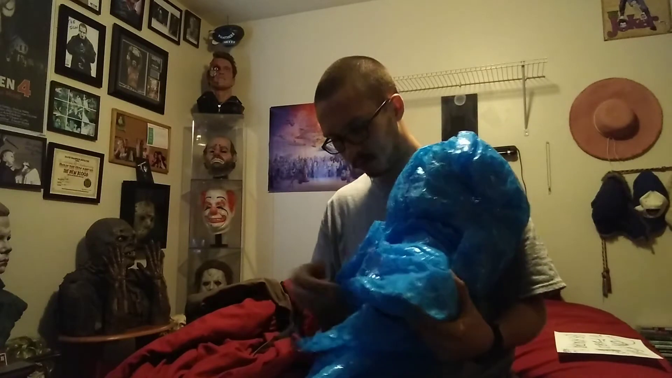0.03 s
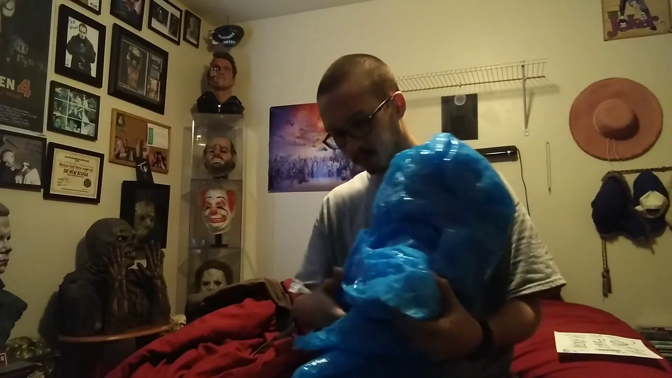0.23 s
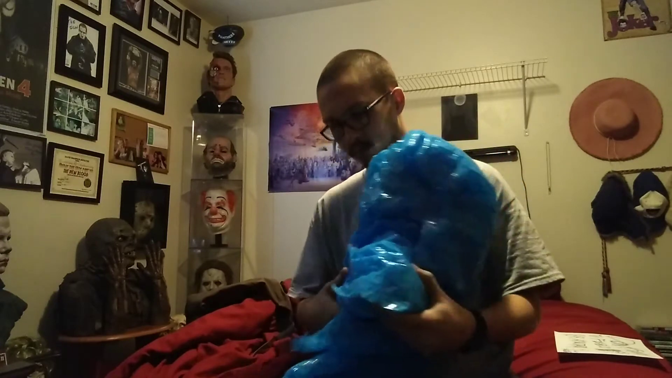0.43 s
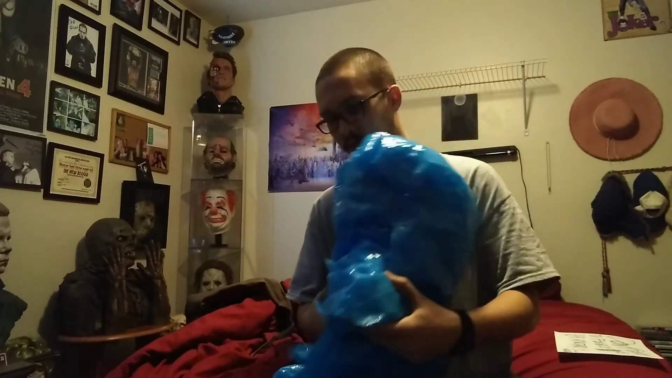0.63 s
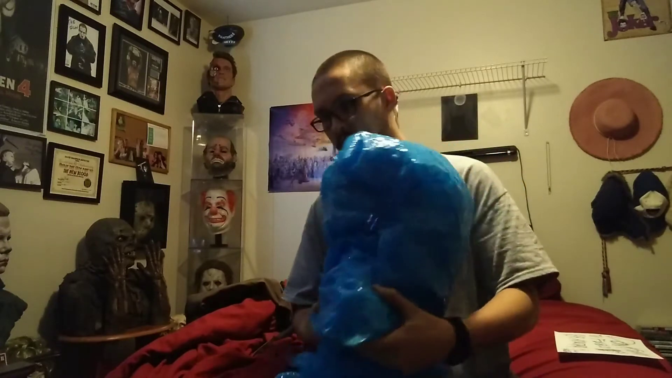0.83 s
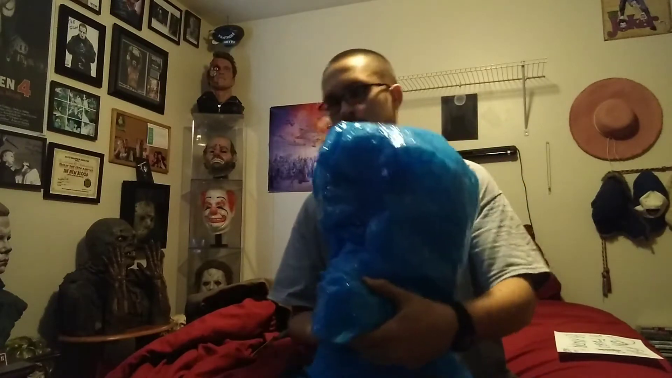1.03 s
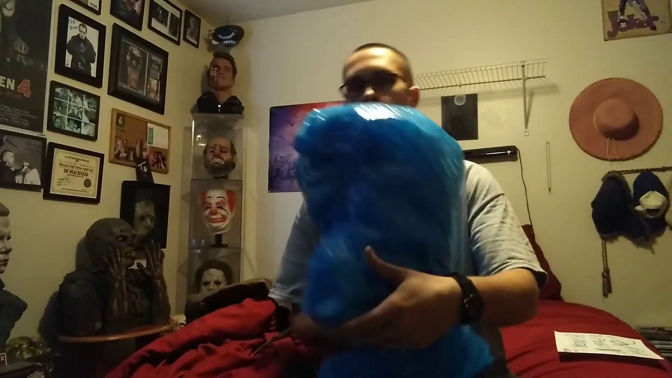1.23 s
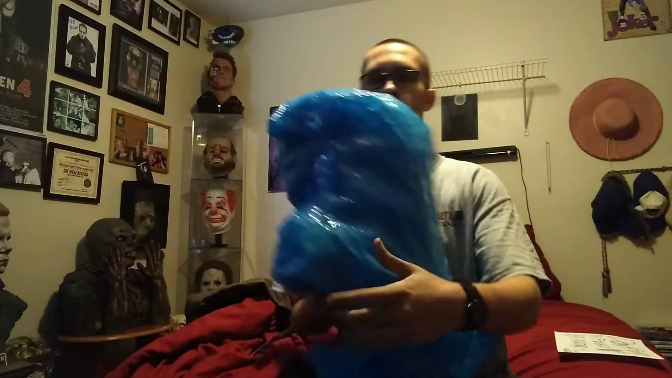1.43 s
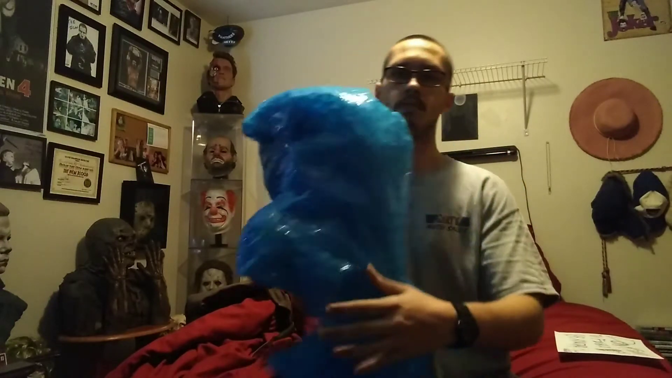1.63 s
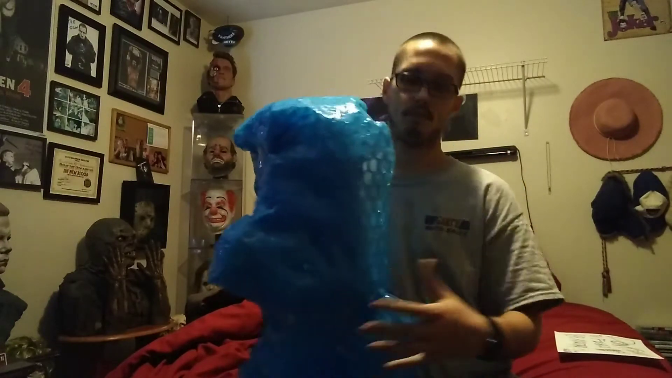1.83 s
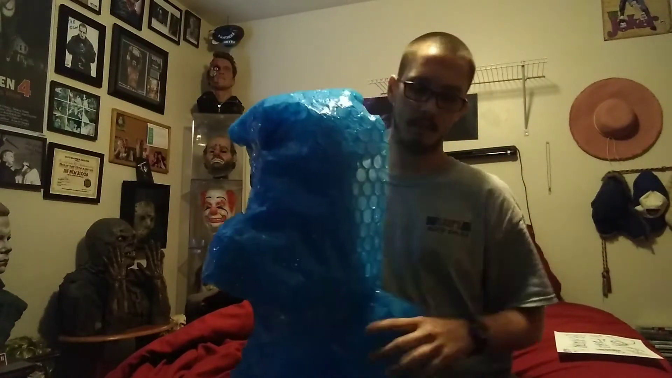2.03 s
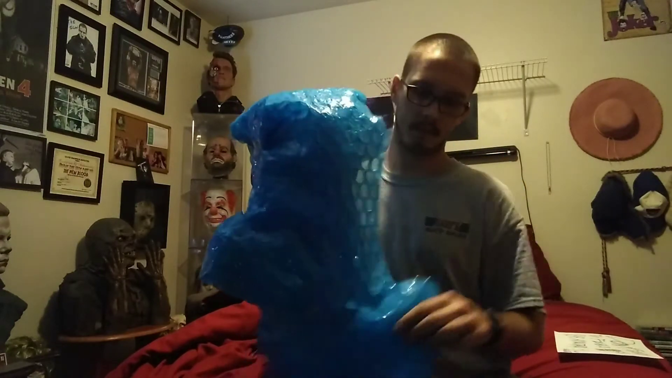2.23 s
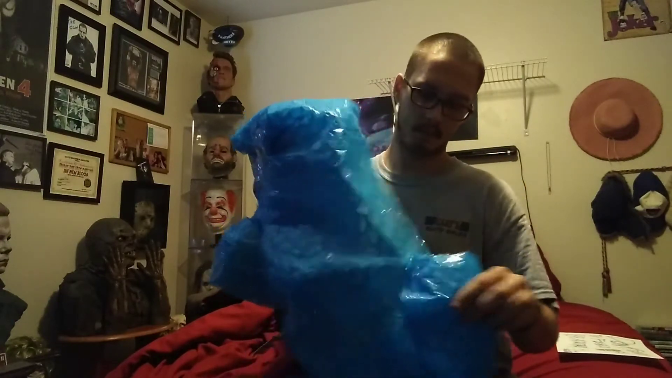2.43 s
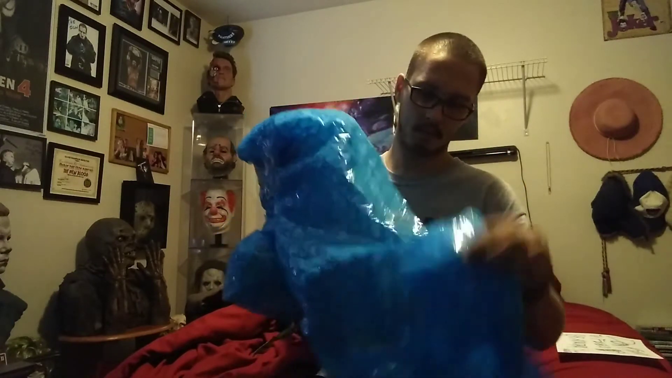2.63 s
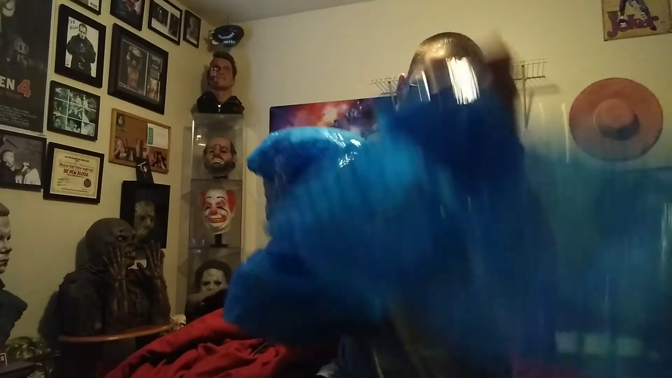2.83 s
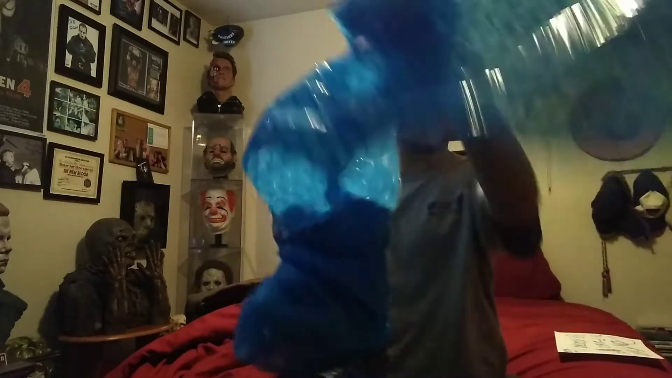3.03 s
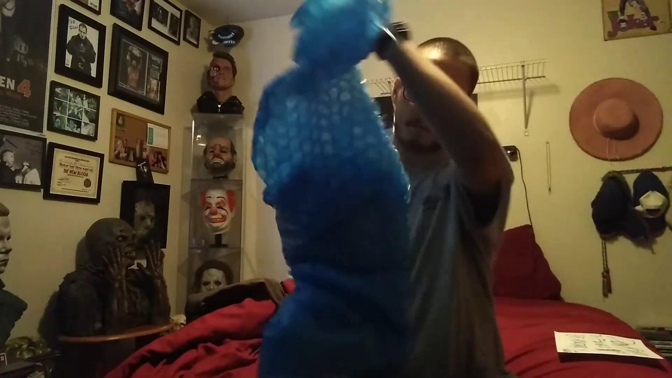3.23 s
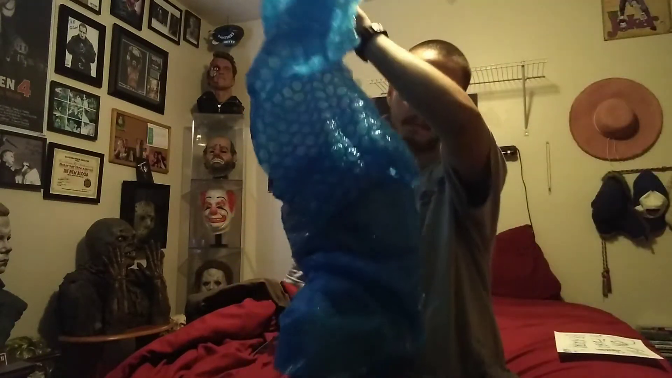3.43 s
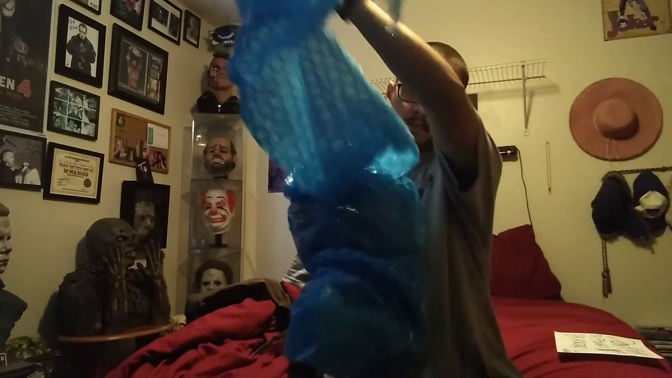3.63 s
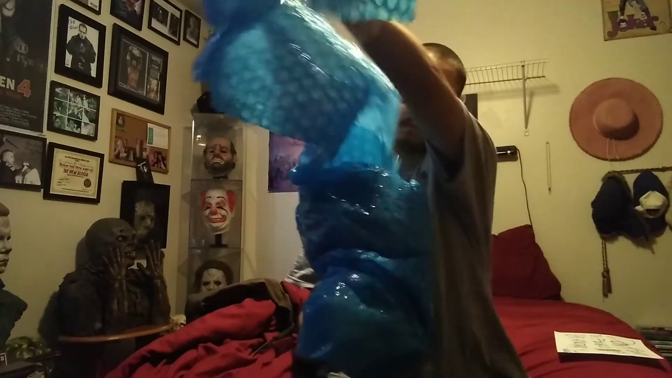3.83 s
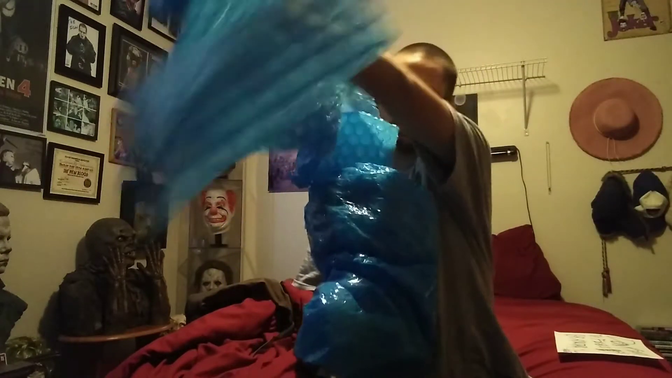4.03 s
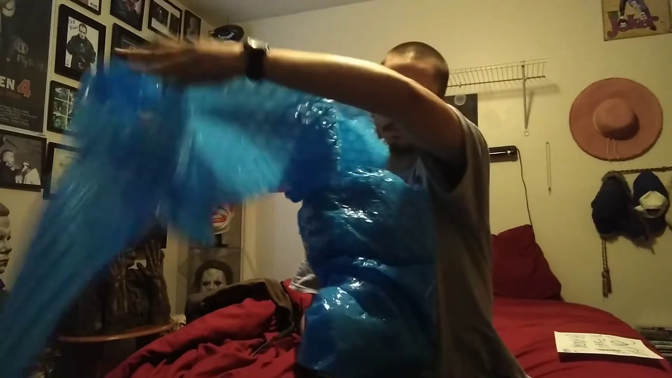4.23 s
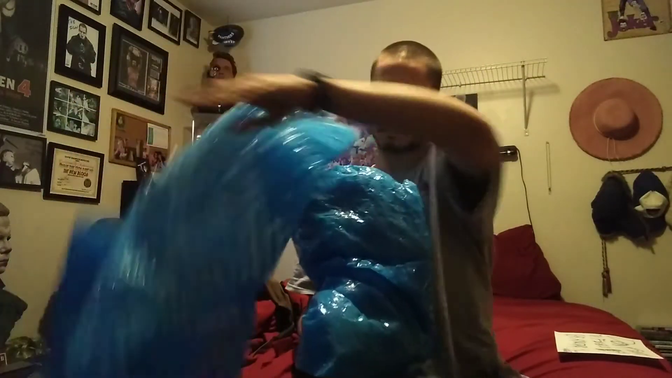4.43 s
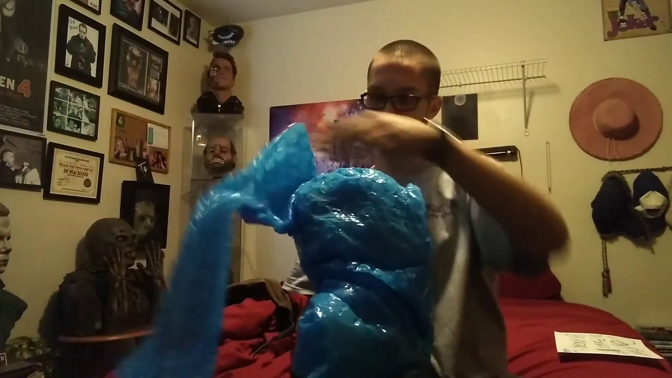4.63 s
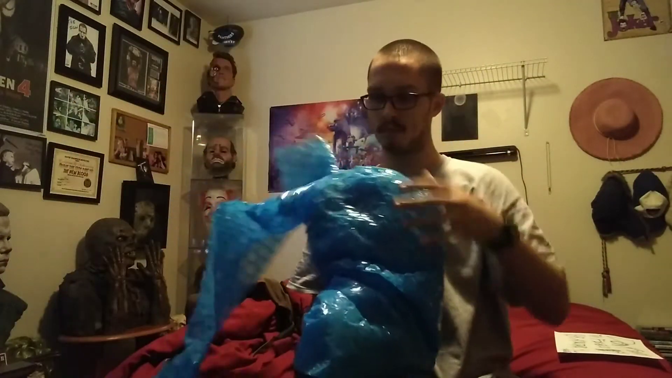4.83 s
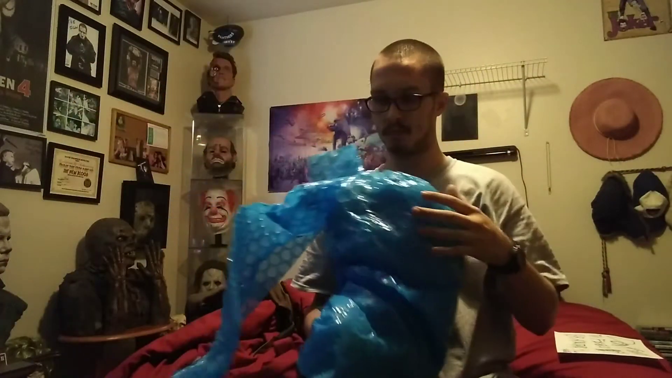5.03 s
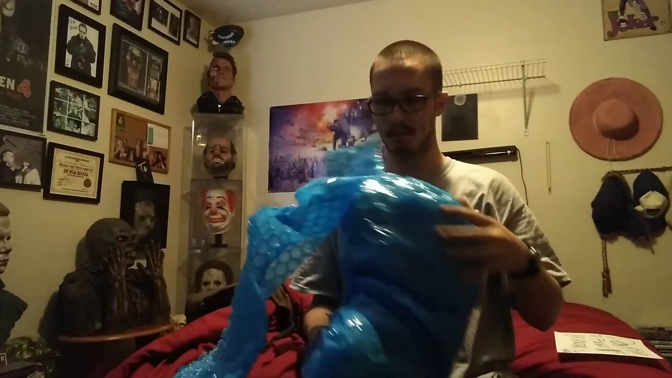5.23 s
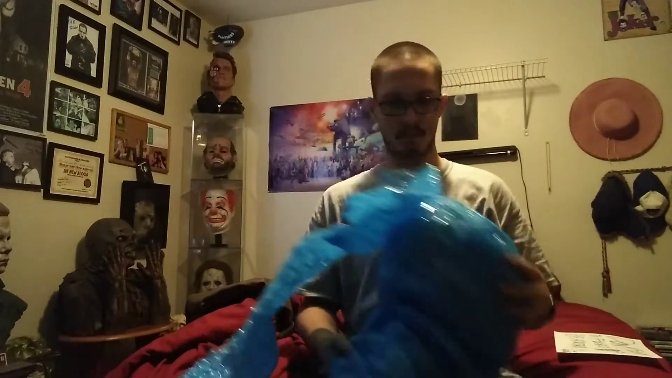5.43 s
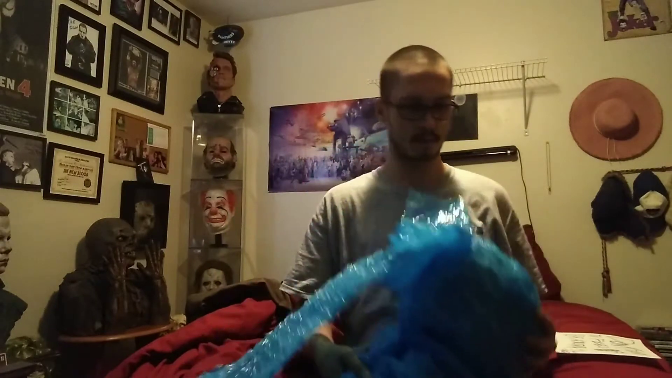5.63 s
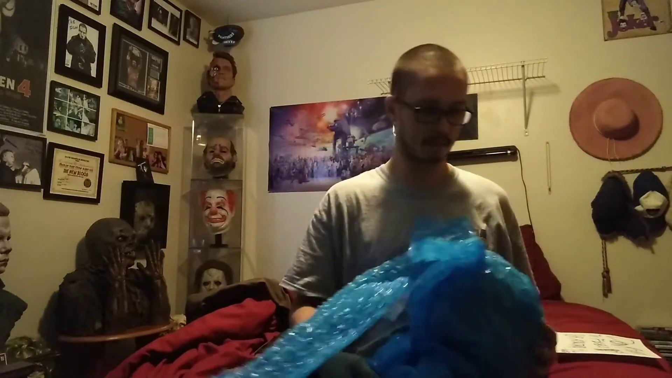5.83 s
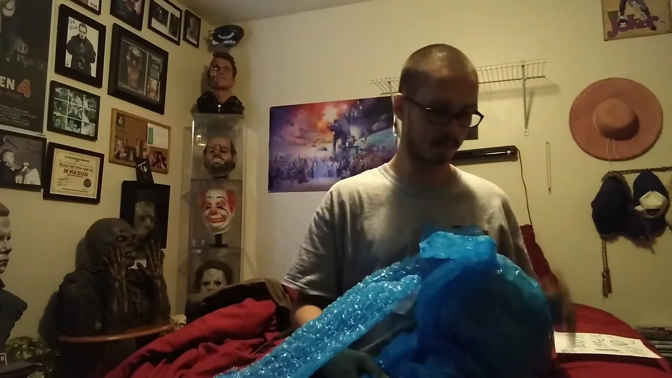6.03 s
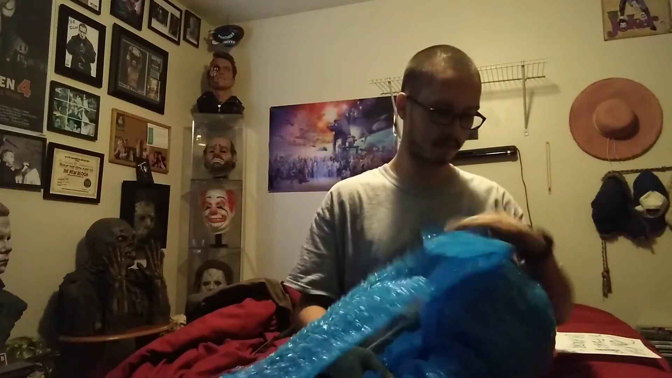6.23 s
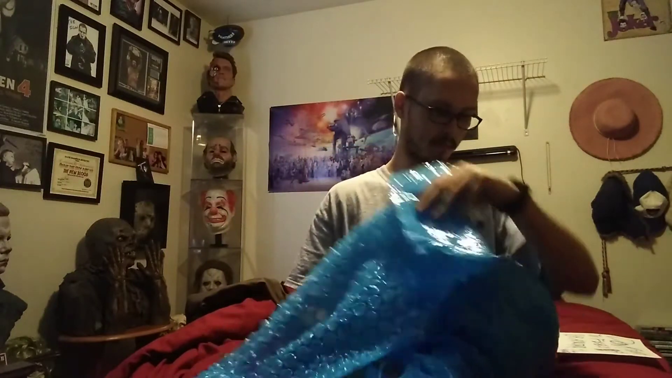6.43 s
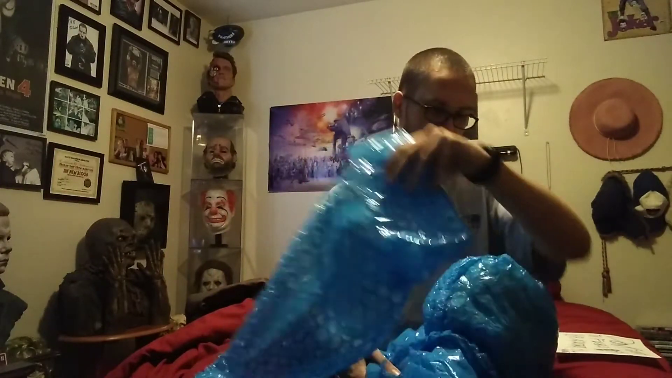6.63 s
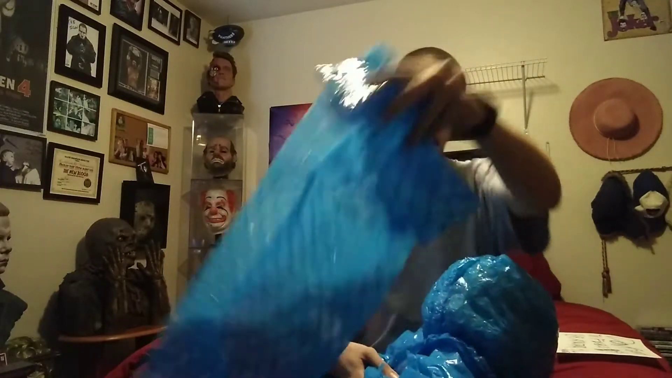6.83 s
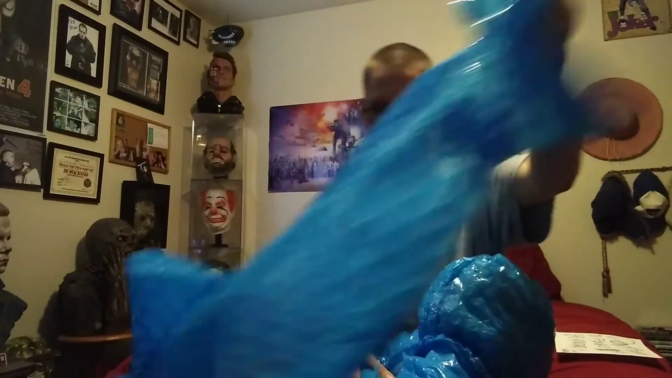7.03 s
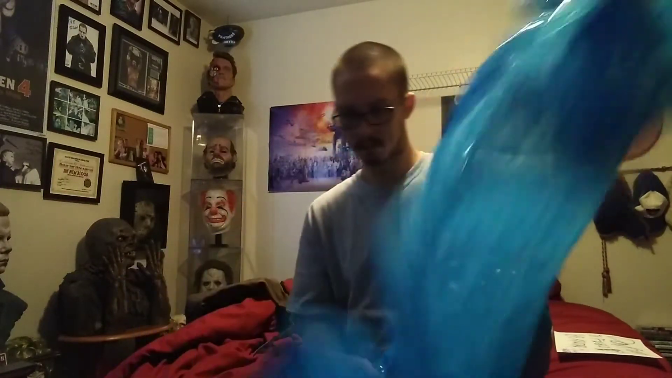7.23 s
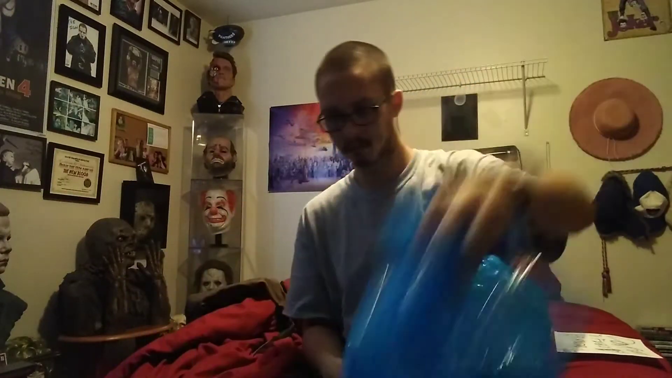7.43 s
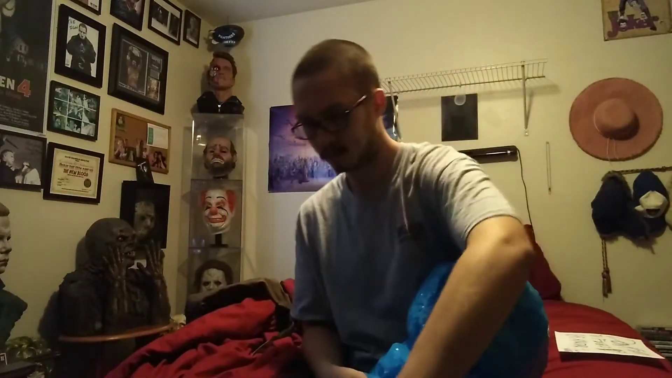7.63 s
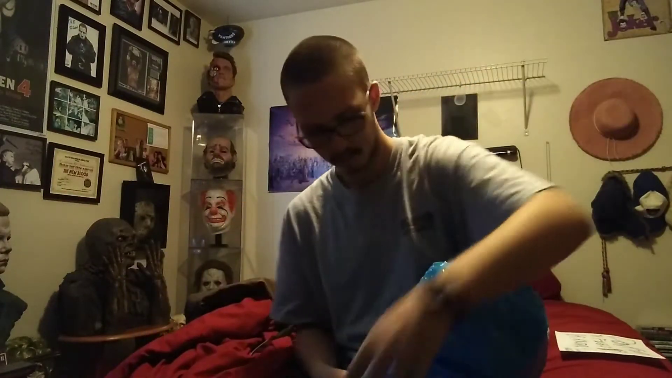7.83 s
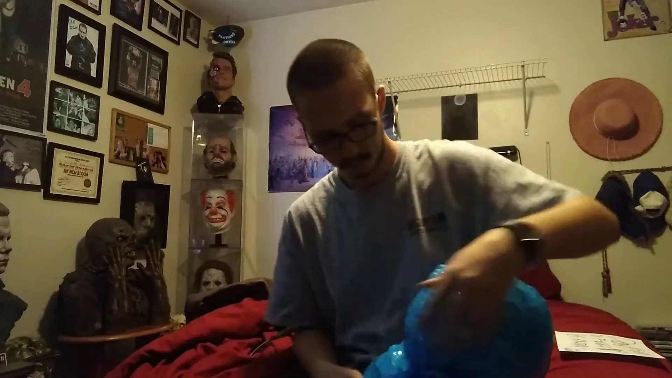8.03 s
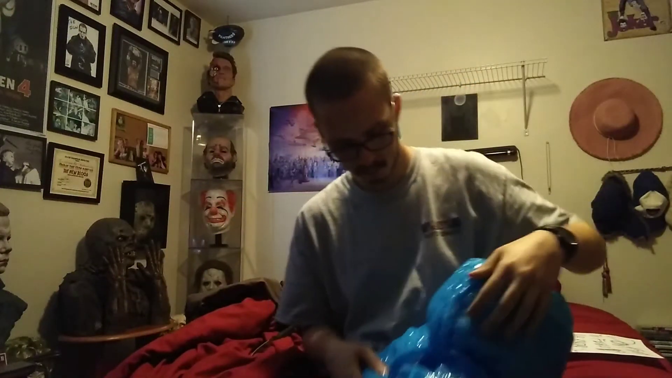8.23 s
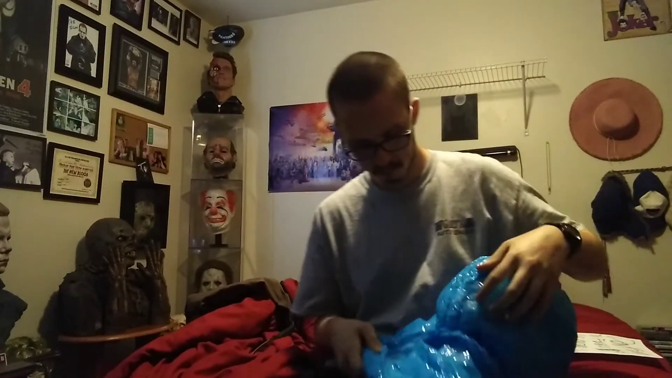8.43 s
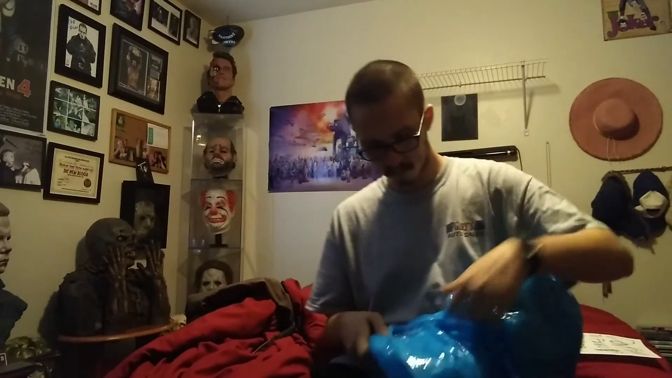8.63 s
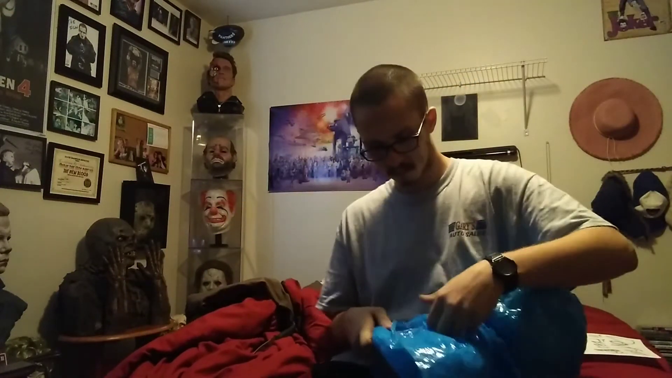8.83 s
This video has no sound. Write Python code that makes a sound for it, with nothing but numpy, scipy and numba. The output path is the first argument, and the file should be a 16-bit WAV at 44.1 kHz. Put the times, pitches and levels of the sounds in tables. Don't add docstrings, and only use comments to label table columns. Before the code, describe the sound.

Hands crinkle and pull crackly plastic bubble wrap off a bundle in a small quiet room, with sharp snaps and one loud ripping burst.

```python
import sys
import numpy as np
from scipy import signal
from scipy.fft import rfft, irfft
from scipy.io import wavfile
from scipy.ndimage import uniform_filter1d
from numba import njit

SR = 44100
rng = np.random.default_rng(int(sys.argv[2]) if len(sys.argv) > 2 else 0)


def nominal_scale(level):
    x = np.asarray(level, float) / 20
    return 10 ** x


def output_pcm(signal):
    pcm = np.clip(np.atleast_2d(signal).T, -1, 1) * 32767
    wavfile.write(sys.argv[1], SR, np.round(pcm).astype(np.int16))


N = 392490

# (start t/s, length t/s, first level/dB, last level/dB)
PULLS = [(0.163, 0.095, -56, -49), (0.629, 0.096, -54.5, -60), (0.911, 0.086, -54.5, -47.5),
         (1.09, 0.074, -53.5, -53), (1.243, 0.1, -58.5, -64.5), (1.468, 0.14, -48, -56),
         (2.199, 0.2, -50, -57), (2.67, 0.11, -57, -58.5), (2.765, 0.14, -51.5, -53.5),
         (2.981, 0.25, -50.5, -42), (3.264, 0.22, -39, -52), (3.48, 0.08, -50, -44.5),
         (3.647, 0.099, -36, -36.5), (4.007, 0.17, -50.5, -48.5), (4.564, 0.121, -52.5, -43),
         (5.073, 0.41, -66, -65.5), (5.52, 0.39, -64, -67), (5.779, 0.11, -53, -47),
         (6.765, 0.12, -53.5, -42), (6.916, 0.18, -41, -37), (7.263, 0.12, -45.5, -38),
         (7.486, 0.19, -42, -43.5), (7.678, 0.16, -43, -53.5), (7.803, 0.39, -53, -71.5),
         (8.285, 0.4, -68, -55.5), (8.73, 0.22, -54, -49)]
# (start t/s, length t/s, first level/dB, last level/dB)
TUGS = [(0.34, 0.036, -48.5, -46.5), (.51, 0.021, -59, -55), (0.31, .01, -57, -59),
        (4.86, .15, -65.5, -69.5), (1.645, 0.14, -68, -74), (2.05, .06, -72, -69),
        (0.766, 0.081, -60.5, -64), (1.906, 0.02, -62, -74), (2.399, .04, -51.5, -60),
        (2.488, 0.06, -56, -37.5), (3.582, .006, -35.5, -32), (3.888, 0.042, -61, -58),
        (4.225, 0.03, -42.5, -35.5), (4.444, 0.037, -63.5, -52.5), (4.785, .01, -53.5, -54.5),
        (5.977, 0.019, -63, -56.5), (6.295, 0.038, -55.5, -35), (6.34, 0.039, -36.5, -24),
        (6.399, 0.055, -31, -26), (6.5, 0.034, -34, -33), (7.14, 0.022, -41, -41),
        (7.166, 0.0072, -34, -39.5), (8.166, 0.039, -63.5, -52), (8.64, 0.034, -57, -55),
        (1.301, .02, -57, -61), (1.344, .02, -58, -60), (7.317, 0.029, -43, -44.5),
        (3.7, 0.0091, -45, -34.5), (1.078, 0.0094, -50, -55)]


def effort():
    t = np.arange(0, N, 64) / SR
    start, length, first_db, last_db = np.transpose(PULLS + TUGS)[:, :, None]
    progress = np.clip((t - start) / np.maximum(length, 1e-3), 0, 1)
    held_db = first_db + (last_db - first_db) * progress
    rise = np.repeat([516, 2000], [len(PULLS), len(TUGS)])[:, None]
    fall = 243
    move_db = held_db - rise * np.maximum(start - t, 0) - fall * np.maximum(t - start - length, 0)
    rest_db = -72
    power = nominal_scale(2 * move_db).sum(axis=0) + nominal_scale(2 * rest_db)
    return np.interp(np.arange(N) / SR, t, 10 * np.log10(power))


# (f/Hz, level/dB per Hz)
WRAP = [(40, -62), (100, -13), (250, -8.5), (500, -2), (850, 2), (1250, -2.5), (1900, 2), (2700, -2.5),
        (4200, -13.5), (6000, -21.5), (8600, -25), (11000, -21.5), (15500, -17.5)]
# (t/s, thud level/dB, crackle level/dB), both against the creases
GRIP = [(0, -21.5, -14), (.45, -2.5, -10.5), (1.1, -11.5, -12), (1.9, -11, -10.5), (2.5, -8, -8.5),
        (3.2, -14, -10), (3.7, -12.5, -8.5), (4.1, -20.5, -9.5), (4.6, -11, -12), (5, -9.5, -9.5),
        (5.9, -9, -13), (6.4, -11, -11), (6.55, -9.5, -11), (7, -17.5, -8), (7.3, -24, -11),
        (7.55, -12, -9), (7.9, -7.5, -10.5), (8.9, -5.5, -10.5)]


def rustle(crease_db):
    folds = swarm(count=19000, lo_hz=150, hi_hz=4970, cycles=1.58, scatter_db=1.0)
    ticks = swarm(count=26000, lo_hz=3140, hi_hz=16300, cycles=0.27, scatter_db=3.0)
    slide = rng.standard_normal(N)
    patchy = nominal_scale(1.19 * walk(60))
    mix = patchy * (nominal_scale(-11) * folds + nominal_scale(-6.5) * ticks + nominal_scale(-7.5) * slide)
    film = rfft(mix) * nominal_scale(on_hz(WRAP))

    low = 1 / (1 + (HZ / 450) ** 4) / (1 + (110 / HZ) ** 4)
    high = 1 / (1 + (4500 / HZ) ** 6)
    middle = 1 / (1 + (450 / HZ) ** 4) - high

    thud_db, crackle_db = crease_db + np.array(curves(GRIP))
    _, snap_db, _, tick_db = np.transpose(SNAPS)
    thud = nominal_scale(thud_db + 0.5 + 0.52 * walk(7.3))
    crease = np.sqrt(nominal_scale(2 * crease_db - 1.0) + bursts(snap_db - 23))
    crackle = np.sqrt(nominal_scale(2 * crackle_db + 13.5) + bursts(snap_db + tick_db - 15))
    parts = ((low, thud), (middle, crease), (high, crackle))
    return sum(unit(irfft(film * share, N)) * size for share, size in parts)


def swarm(count, lo_hz, hi_hz, cycles, scatter_db):
    when, pitch, strength, sign = rng.random((count, 4)).T
    hz = lo_hz * (hi_hz / lo_hz) ** pitch
    extra_db = np.minimum(-scatter_db * np.log(1 - strength), 16)
    size = hz * np.sign(sign - .5) * nominal_scale(extra_db)
    return unit(rings((when * N).astype(np.int64), hz, np.full(count, 1. * cycles), size))


@njit
def rings(start, hz, cycles, size):
    out = np.zeros(N)
    for g in range(len(start)):
        turn = np.exp((2j * np.pi - 1 / cycles[g]) * hz[g] / SR)
        z = size[g] + 0j
        end = min(N, start[g] + int(6 * cycles[g] * SR / hz[g]) + 1)
        for i in range(start[g], end):
            out[i] += z.real
            z *= turn
    return out


def bursts(db):
    start = (np.transpose(SNAPS)[0] * SR).astype(np.int64)
    hz = 1e-3
    cycles = hz * 0.11 / np.log(1e6)
    return np.abs(rings(start, np.full(len(start), hz), np.full(len(start), cycles), nominal_scale(2 * db)))


# (t/s, peak level/dB, ring f/Hz, tick level/dB against the ring)
SNAPS = [(0.349, -30.5, 1020, -8), (0.523, -45, 487, -21), (0.633, -38, 473, -28), (0.778, -39.5, 1040, -5),
         (1.073, -30.5, 1000, -34), (1.303, -45, 912, -20), (1.466, -31, 1020, -2.5),
         (1.555, -39, 1060, -23), (2.257, -30.5, 610, -4.5), (2.4, -39, 446, 1.5), (2.511, -37, 1030, 3),
         (2.548, -17.5, 1620, -9), (2.78, -31, 1050, -7), (3.202, -23.5, 930, -6),
         (3.262, -21.5, 1080, 1.5), (3.582, -8.5, 594, -25), (3.699, -19.5, 910, -11),
         (3.892, -32, 3000, -34), (4.003, -41, 960, -3), (4.048, -37, 1220, 4.5), (4.09, -48, 1080, 7),
         (4.233, -26.5, 890, -27), (4.787, -39, 828, -8), (6.303, -52, 966, -12), (6.355, -14.5, 845, -36),
         (6.37, -7, 860, -24), (6.427, -7, 960, -39), (6.515, -16, 530, -27), (6.769, -47, 840, -25.5),
         (7.168, -16, 1420, -13)]
# (t/s, peak level/dB, ring f/Hz, tick level/dB against the ring)
TEAR = [(3.727, -20, 536, -10), (3.741, -20.5, 490, 8.5), (6.364, -9, 860, -33), (6.377, -14, 760, -35),
        (6.381, -3.5, 1000, -35), (6.389, -16, 1040, -33), (6.407, -15, 820, -24), (6.421, -9, 950, -30),
        (6.434, -14, 830, -21), (6.439, -10.5, 544, -29), (6.454, -16, 523, -8), (6.464, -11.5, 830, -2)]
# (t/s, peak level/dB)
TICKS = [(0.626, -59), (1.348, -43), (1.9097, -53), (3.2994, -36), (3.675, -28.5), (3.7, -23),
         (3.7165, -30), (5.419, -47.5), (5.5792, -51), (5.6526, -58), (6.327, -34), (7.108, -28),
         (7.1414, -39), (7.179, -40), (8.2024, -45), (8.504, -48)]
# (t/s, peak level/dB, f/Hz)
BUMPS = [(0.369, -36, 239.5), (2.536, -37, 251), (4.602, -39, 165), (4.639, -46, 160), (4.659, -45, 163),
         (6.925, -37.5, 155), (6.972, -41, 228), (6.99, -42, 173), (7.815, -44, 229), (7.828, -39, 297),
         (7.842, -39, 260)]


def snaps():
    s, db, hz, tick_db = np.transpose(SNAPS + TEAR)
    start = (s * SR).astype(np.int64)
    ring = rings(start, hz, np.full(len(s), 1.8), nominal_scale(db - 5))
    ring += rings(start + 30, 1.96 * hz, np.full(len(s), 1.2), -nominal_scale(db - 12.5))
    bright = spray(s, db + tick_db - 11.5, length_s=.0015)

    s, db = np.transpose(TICKS)
    bright += spray(s, db + 3.0, length_s=0.00054)

    s, db, hz = np.transpose(BUMPS)
    thud = rings((s * SR).astype(np.int64), hz, np.full(len(s), 5.5), nominal_scale(db - 2.0))
    dull = signal.butter(2, 350, fs=SR, output="sos")
    return ring + bright + signal.sosfilt(dull, thud)


def spray(s, db, length_s):
    puffs = rings((s * SR).astype(np.int64), np.ones(len(s)), np.full(len(s), 1. * length_s), nominal_scale(db))
    bright = signal.butter(2, 4000, "high", fs=SR, output="sos")
    return signal.sosfilt(bright, puffs * rng.standard_normal(N))


def room(x, count=7, hops=25, t60_s=0.18, wet_db=-3):
    t = np.arange(int(.3 * SR)) / SR
    stay = (SR / hops * rng.uniform(.6, 1.4, 400)).astype(int)
    spot = np.repeat(rng.integers(0, count, 400), stay)[:N]
    out = np.zeros((2, N))
    for k in range(count):
        fade = nominal_scale(-60 * t / t60_s) * np.minimum(t / 0.0013, 1)
        paths = rng.standard_normal((2, len(t))) * fade
        paths *= nominal_scale(wet_db) / np.sqrt(np.sum(paths ** 2, axis=1, keepdims=True))
        paths[0, 0] += 1
        paths[1, 2 * k] += (-1) ** k
        here = np.sqrt(np.maximum(uniform_filter1d(1. * (spot == k), size=300), 0))
        out += signal.oaconvolve((x * here)[None], paths, axes=1)[:, :N]
    return out / np.sqrt(1 + nominal_scale(2 * wet_db))


# (f/Hz, likeness from -1 to 1)
LIKENESS = [(100, .96), (500, .92), (1000, .55), (1500, -.55), (2100, -.15), (2800, -.12), (4500, .05)]
# (f/Hz, share in left 0-1, share in right 0-1)
CROSS = [(300, .85, .85), (2200, .77, .77), (3300, .66, .66), (4500, .54, .54), (8000, .5, .5),
         (9500, .38, .16), (15500, .3, .1)]
# (f/Hz, left minus right level/dB)
LEFT_LIFT = [(100, 3.5), (200, 0), (1250, 0), (2500, -1), (6000, 0), (10000, 1), (13000, -.5), (15500, -1)]


def port_pair(paths):
    like = np.clip(on_hz(LIKENESS), -.9, .995)
    shared, apart = rfft(paths, axis=1) * np.sqrt([(1 + like) / 2, (1 - like) / 2])
    late = np.exp(-2j * np.pi * HZ * 0.000451)
    out = []
    for k, sign in ((1, 0.84), (2, -0.93)):
        cross = np.clip(on_hz(CROSS, column=k), 0, 1)
        power = 1 + cross ** 2 - 2 * cross * like * late.real
        mix = shared * (1 - cross * late) + sign * apart * (1 + cross * late)
        lift = nominal_scale(sign * on_hz(LEFT_LIFT) / 2)
        out.append(irfft(mix / np.sqrt(power) * lift, N))
    return np.array(out)


def gate(pull_db):
    lag_s, knee_db, soft_db = 0.013, -55.5, 10.5
    mid_db, span_db = -60.5, 7
    heard_db = 10 * np.log10(uniform_filter1d(nominal_scale(2 * pull_db), int(lag_s * SR)) + 1e-12)
    return mid_db + span_db * np.tanh((heard_db - knee_db) / soft_db)


# (f/Hz, left level/dB, right level/dB)
HUM = [(119.6, 1.5, -4), (238.3, -11, -1.5)]
# (f/Hz, level/dB per Hz)
HISS = [(25, -21), (60, 3.5), (170, 6), (400, -11), (1000, 8), (1900, -6.5), (2800, -7), (5000, -14.5),
        (8600, -18.5), (15500, -14.5)]


def background(gate_db):
    t = np.arange(N) / SR
    hum = np.zeros((2, N))
    for hz, left_db, right_db in HUM:
        hum += np.sqrt(2) * nominal_scale([[left_db], [right_db]]) * np.sin(2 * np.pi * hz * t)
    hiss = irfft(rfft(rng.standard_normal((2, N)), axis=1) * nominal_scale(on_hz(HISS)), N, axis=1)
    swell_db = 1.3 * walk(8.6)
    flutter_db = .8 * walk(11)
    hiss_db = -5.5 + swell_db
    return nominal_scale(gate_db + flutter_db) * (hum + nominal_scale(hiss_db) * port_pair(unit(hiss)))


HZ = np.arange(N // 2 + 1) * SR / N + 1e-3


def on_hz(table, column=1):
    rows = np.array(table)
    return np.interp(np.log(HZ), np.log(rows[:, 0]), rows[:, column])


def curves(rows):
    s, *columns = np.transpose(rows)
    return [np.interp(np.arange(N) / SR, s, c) for c in columns]


def unit(x):
    return x / np.sqrt(np.mean(x ** 2))


def walk(rate):
    k = int(SR / rate)
    steps = np.repeat(rng.standard_normal(N // k + 1), k)
    return 1.49 * uniform_filter1d(steps, k)[:N]


def scene():
    pull_db = effort()
    wrap = nominal_scale(0.5) * (rustle(pull_db) + snaps())
    return port_pair(room(wrap)) + background(gate(pull_db))


# (f/Hz, level/dB)
MASK = [(1000, 25), (1600, 15), (2200, 13), (4500, 9.5), (7000, 8), (9000, 6.5), (10500, 8)]


def drop_masked(x, flicker_db=17, size=13):
    lead = 1024 - 579
    pair = np.pad(np.array([x[0] + x[1], x[0] - x[1]]) / 2, ((0, 0), (lead, 0)))
    window = np.sin(np.pi * (np.arange(2048) + .5) / 2048)
    frames = dict(window=window, nperseg=2048, noverlap=1024)
    spec = signal.stft(pair, **frames)[2]

    def smooth(values, bins):
        return uniform_filter1d(uniform_filter1d(values, bins, axis=1), size=2, axis=2)

    power = smooth(np.abs(spec) ** 2, size)
    margin_db = np.interp(np.linspace(0, SR / 2, spec.shape[1]), *np.transpose(MASK))[:, None]
    budget_db = margin_db + flicker_db * smooth(rng.standard_normal(spec.shape), 24)
    keep = power * nominal_scale(budget_db) ** 2 > power[::-1]
    keep[:, :45] = True
    mid, side = signal.istft(spec * keep, **frames)[1][:, lead:lead + N]
    return np.array([mid + side, mid - side])


def top_cut(x):
    return signal.sosfilt(signal.butter(12, 16020, fs=SR, output="sos"), x)


# (f/Hz, level/dB)
TOP = [(15450, 0), (15580, -32), (15850, -60)]


def record(dry):
    rounded = .5 * np.tanh(2 * dry)
    cut = irfft(rfft(rounded, axis=1) * nominal_scale(on_hz(TOP)), N, axis=1)
    mix = drop_masked(cut)
    return top_cut(mix)


dry = scene()
out = record(dry)
output_pcm(out)
```